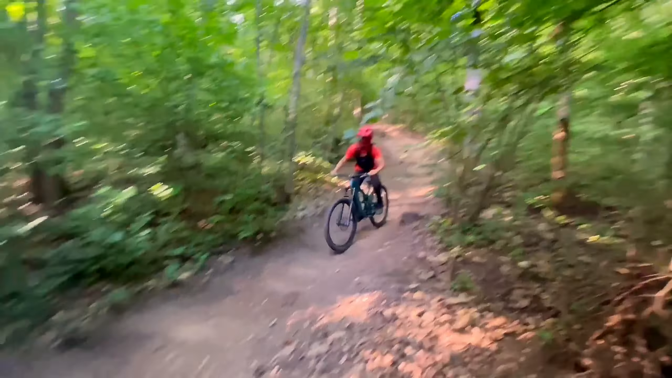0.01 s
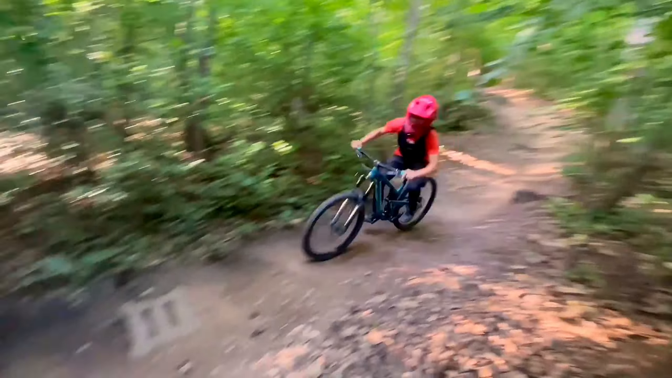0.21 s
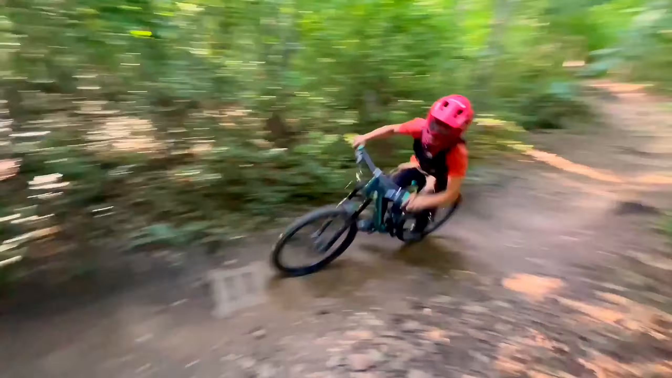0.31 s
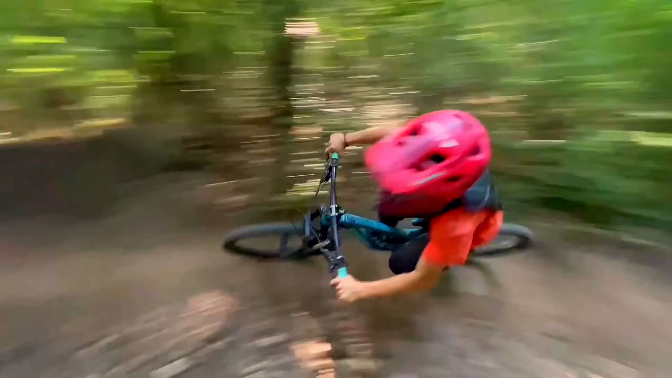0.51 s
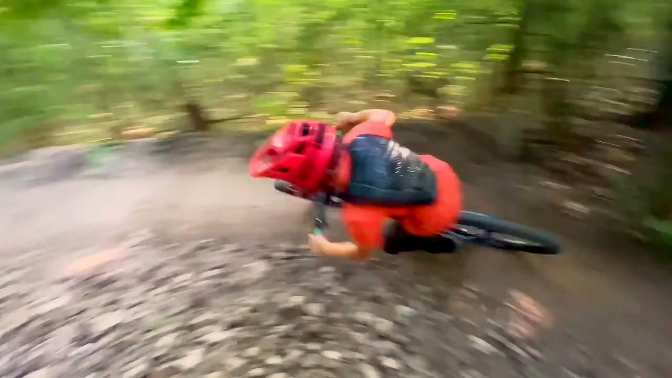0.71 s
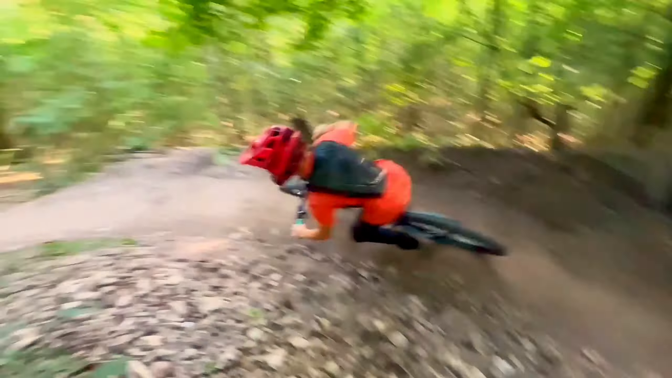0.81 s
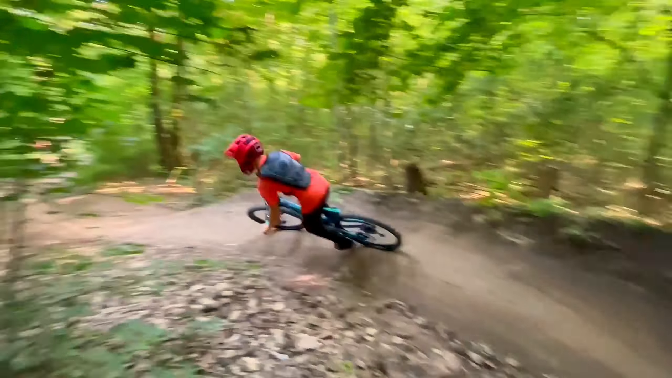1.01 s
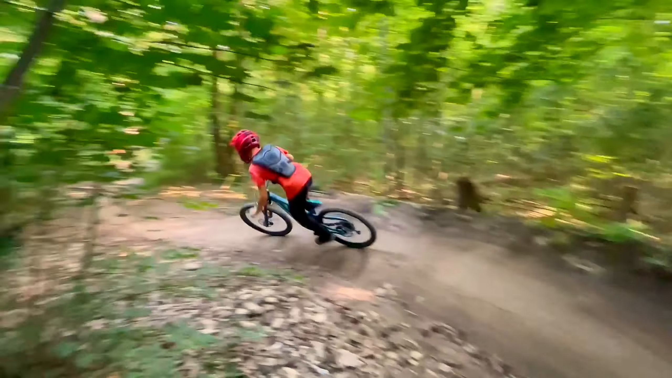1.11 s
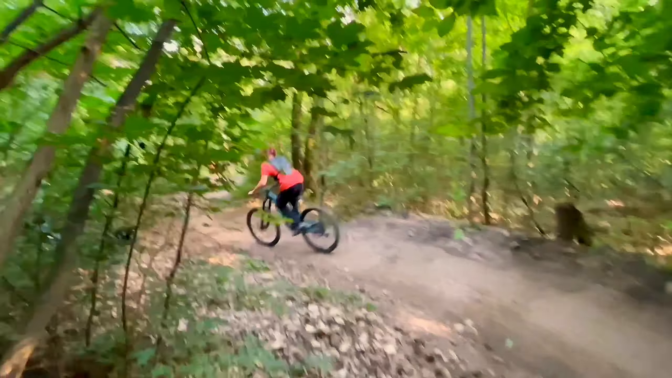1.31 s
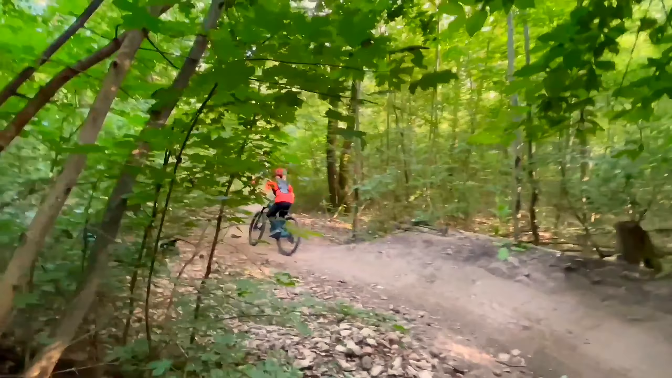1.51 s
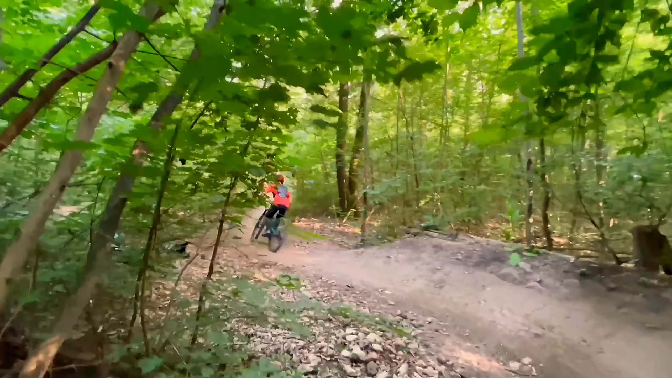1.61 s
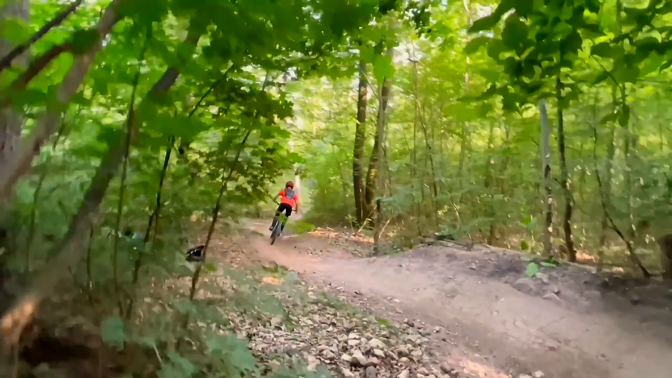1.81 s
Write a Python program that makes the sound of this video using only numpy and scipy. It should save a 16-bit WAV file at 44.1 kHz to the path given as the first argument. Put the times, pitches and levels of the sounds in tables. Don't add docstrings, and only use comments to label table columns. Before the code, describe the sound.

Mountain bike tyres rumble and clatter past close by on a dirt trail, then quickly fade

```python
import sys
import numpy as np
from scipy import signal
from scipy.fft import rfft, irfft
from scipy.io import wavfile
from scipy.ndimage import uniform_filter1d

SR = 44100
rng = np.random.default_rng(int(sys.argv[2]) if len(sys.argv) > 2 else 0)


def field_ratio(decibels):
    return 10 ** (np.asarray(decibels, dtype=float) / 20)


def bounce(signal):
    frames = np.transpose(np.atleast_2d(signal))
    limited = np.clip(frames, -1, 1)
    pcm = np.round(limited * 32767).astype(np.int16)
    wavfile.write(sys.argv[1], SR, pcm)


N = 83790


def evened(x):
    return x / np.sqrt(np.mean(x ** 2) + 1e-20)


def read(points, hz):
    f, value = np.transpose(points)
    return np.interp(np.log(hz + 1), np.log(f + 1), value)


def curve(rows, axis):
    rows = np.array(rows)
    return np.interp(np.arange(N) / SR, rows[:, 0], rows[:, axis])


def add(mix, start_s, sound):
    part = mix[round(start_s * SR):][:len(sound)]
    part += sound[:len(part)]


def resonate(x, hz, width_hz):
    turn = np.exp(2j * np.pi * hz * np.arange(len(x)) / SR)
    r = np.exp(-np.pi * abs(width_hz) / SR)
    return 2 * (turn * signal.lfilter([1 - r], [1, -r], x / turn)).real


def rings(x, modes):
    return sum(field_ratio(db) * evened(resonate(resonate(x, hz, w), hz, w)) for hz, w, db in modes)


def colour(x, points):
    hz = np.fft.rfftfreq(len(x), 1 / SR)
    gain_db = read([(0, -54)] + list(points) + [(SR / 2, -120)], hz)
    return evened(irfft(rfft(x) * field_ratio(gain_db), len(x)))


def wander(size):
    smooth = uniform_filter1d(rng.standard_normal(N), size)
    return evened(uniform_filter1d(smooth, size))


def grains(per_s, spread_db):
    chance, size, sign = rng.random((3, N))
    clicks = (chance < per_s / SR) * np.sign(sign - .5)
    return evened(clicks * field_ratio(spread_db * np.minimum(-np.log(size + 1e-9), 5)))


def drift_field(frames, bins, frame_span, bin_span):
    field = uniform_filter1d(rng.standard_normal((frames, bins)), size=frame_span, axis=0)
    return evened(uniform_filter1d(field, size=bin_span, axis=1)).T


def patchy(x, depth_db):
    hz, t, z = signal.stft(x, SR, nperseg=256, noverlap=192)
    field = drift_field(len(t), len(hz), 40, 5)
    return evened(signal.istft(z * field_ratio(depth_db * field), SR, nperseg=256, noverlap=192)[1][:N])


def tyres():
    # time in seconds, level in dB, cornering load [0-1]
    roll = [(0, -48.5, 0), (.17, -48.5, 0.74), (.24, -43.5, 0.48), (.52, -28, 0.2), (.57, -23.5, 0.5),
            (.66, -28, 0.73), (.74, -31.5, 0.82), (.9, -33, 0.99), (1.0, -31.5, 0.96), (1.088, -27.5, 0.81),
            (1.108, -41, 0.34), (1.2, -46.5, 0.6), (1.225, -37, 0.08), (1.4, -46, 0), (1.48, -41.5, 0),
            (1.7, -41.5, 0.43), (1.8, -45, 0.25), (1.9, -51.5, 0.6)]
    # pitch in Hz, width in Hz, level in dB
    casing_modes = [(249.4, 163, 3), (390, 147, -2.5), (900, 300, -6.5), (153, 69, -7.5)]
    # pitch in Hz, width in Hz, level in dB
    tread_modes = [(1412, 480, 3.5), (1153, 96, -9)]
    # frequency in Hz, level in dB
    scuff_spectrum = [(140, -29), (250, -3), (450, -7.5), (640, -13), (870, -7), (1400, -16), (2000, -14.5),
                      (2700, -19.5)]
    knobs_per_s, knob_jitter = 200, .4
    load_db, slack_db = 41, -14
    scuff_db, scuff_duck_db = -1.5, -6
    rumble_db, rumble_duck_db = -8, -3.5

    turns = np.cumsum(knobs_per_s * (1 + knob_jitter * wander(size=100))) / SR
    knobs = evened(np.diff(np.floor(turns), prepend=0) * field_ratio(2.9 * rng.standard_normal(N)))
    load = np.clip(curve(roll, axis=2), 0, 1)
    slack = 1 - load

    casing = rings(knobs + field_ratio(-2) * grains(2400, 4.5), casing_modes)
    casing = casing * field_ratio(slack_db * slack + 0.58 * wander(size=800))
    tread = rings(knobs + field_ratio(-1.5) * grains(2200, 2.6), tread_modes)
    tread = tread * field_ratio(-load_db * slack + slack_db * slack)
    scuff = patchy(colour(grains(6000, 2.86), scuff_spectrum), depth_db=2.35)
    scuff = scuff * field_ratio(scuff_db + scuff_duck_db * load + 0.3 * wander(size=500))
    rumble = rings(grains(400, 0.98), [(62, 60, 0), (140, 70, -4)])
    rumble = rumble * field_ratio(rumble_db + rumble_duck_db * load)

    rolling = field_ratio(-1.5) * (casing + tread) + scuff + rumble
    dip = 0.6 * load * resonate(rolling, hz=650, width_hz=127)
    return field_ratio(curve(roll, axis=1)) * (rolling - dip)


def knocks():
    # start in seconds, peak in dB, bright snap re knock in dB,
    # knock pitch in Hz, rattle length in seconds
    bumps = [(.004, -34.5, -14, 1400, 0.0042), (.024, -39, -20, 1570, 0.0026),
             (0.04, -48, -19, 1010, 0.004), (0.05, -33, -7, 980, 0.012), (0.09, -35.5, -10, 1180, 0.013),
             (0.099, -37, -11, 860, 0.023), (0.144, -36.5, -7, 1770, 0.0068), (0.172, -36, -21, 695, .008),
             (0.187, -27, -11.5, 1480, 0.0057), (0.206, -36, -5, 1790, 0.0026),
             (0.217, -26, -11, 1390, 0.0089), (0.229, -35, -4, 1510, 0.0094),
             (0.245, -41, -18, 650, 0.0025), (0.271, -31.5, -3, 1170, 0.0059),
             (0.28, -39.5, -1, 1470, 0.011), (.315, -20.5, -12, 1470, 0.016),
             (0.364, -25, -6, 1680, 0.0071), (0.378, -30, -2, 1800, .003), (0.427, -19.5, -5, 1480, 0.0068),
             (0.441, -26, -17, 1800, .003), (0.461, -12.5, -10, 1720, 0.0031),
             (0.468, -19, -16, 1180, 0.0023), (.478, -20, -18, 1390, 0.0035),
             (0.487, -27, -14, 2020, 0.005), (0.494, -30, -3, 1800, 0.0051),
             (0.518, -30, -17, 1320, 0.0037), (0.534, -18.5, -4, 1490, 0.0033),
             (0.547, -22.5, 0.5, 1440, 0.0038), (0.557, -21.5, -7, 1490, 0.0087),
             (0.572, -13.5, -12, 1400, 0.0025), (.582, -23, -27, 1280, 0.018),
             (0.595, -22.5, -7, 1800, 0.0037), (0.606, -26, -2.5, 900, 0.018),
             (0.625, -21.5, -20, 1900, 0.0051), (.654, -19.5, -9, 870, 0.0042),
             (1.131, -37, -22, 1530, .004), (1.15, -34, -16, 1440, 0.025), (1.211, -27, -23, 1010, 0.0075),
             (1.23, -31, -32, 1490, 0.011), (1.465, -36, -8, 1810, 0.005)]
    knock_db, rise_s, t60_s = -7, 0.0024, 0.024
    out, t = np.zeros(N), np.arange(2500) / SR
    dull = signal.butter(3, 5100, fs=SR)
    for start_s, db, snap_db, hz, hold_s in bumps:
        noise = rng.standard_normal(len(t))
        body = rings(noise, [(hz, 790, 0), (660, 300, -5)])
        body = body / np.sqrt(uniform_filter1d(body ** 2, size=200) + 0.18)
        snap = rings(noise, [(2500, 2000, 0), (4300, 1500, -11)])
        rattle = signal.lfilter(*dull, body + field_ratio(snap_db) * snap)
        fade = field_ratio(db + knock_db - 60 * np.maximum(t - hold_s, 0) / t60_s)
        add(out, start_s, rattle * np.minimum(t / rise_s, 1) * fade)
    return out


def clacks():
    # start in seconds, peak in dB, pitch in Hz, width in Hz
    strikes = [(.0075, -30, 1790, 1190), (.058, -36.5, 650, 252), (.0935, -31, 2000, 2200),
               (.175, -40, 700, 150), (.1865, -20.5, 1800, 2200), (.189, -28, 670, 250),
               (.222, -30, 687, 180), (.237, -26.5, 654, 200), (.249, -34, 650, 250),
               (0.2746, -24, 2600, 3000), (0.3642, -24, 2800, 2500), (.4285, -19, 4500, 3500),
               (.4285, -24, 11000, 7000), (.43, -19, 1670, 500), (0.4646, -11.5, 1870, 1290),
               (.4655, -12.5, 940, 593), (.491, -24, 2100, 450), (.519, -17, 1340, 330),
               (.5485, -17, 1500, 1300), (.5745, -7, 1890, 2500), (.5955, -22.5, 1770, 600),
               (1.217, -24, 1110, 1200)]
    out, impulse = np.zeros(N), np.arange(1000) == 0
    for start_s, db, hz, width_hz in strikes:
        ring = rings(impulse, [(hz, width_hz, 0)])
        add(out, start_s, field_ratio(db) * ring / abs(ring).max())
    return out


def thumps():
    # start in seconds, peak in dB, settled pitch in Hz
    hits = [(.042, -47, 61), (0.056, -40.5, 60), (0.096, -36, 60), (.109, -46, 60), (0.15, -39, 59.6),
            (0.191, -27, 58.6), (.222, -33, 60), (0.236, -36, 60), (0.274, -37, 61.7), (0.319, -24, 59.5),
            (.367, -25.5, 60.7), (0.429, -17.5, 56), (0.466, -20.5, 51.7), (.55, -22, 60),
            (0.573, -18, 79.6), (0.649, -37, 55.6), (0.918, -49, 65), (0.974, -36, 122), (1.08, -33, 141),
            (1.15, -37.5, 59), (1.34, -44, 59.7)]
    from_hz, sag_s, rise_s, t60_s = 215, 0.0066, 0.0023, 0.23
    out, t = np.zeros(N), np.arange(6000) / SR
    for start_s, db, hz in hits:
        cycles = hz * t + (from_hz - hz) * sag_s * (1 - np.exp(-t / sag_s))
        envelope = np.minimum(t / rise_s, 1) * field_ratio(db - 60 * t / t60_s)
        add(out, start_s, -envelope * np.sin(2 * np.pi * cycles))
    return out


def spray():
    # time in seconds, level in dB
    level = [(0, -60), (.16, -58), (.195, -49), (.418, -43), (.428, -35), (.44, -39.5), (.568, -35.5),
             (.576, -22), (.6, -30), (.68, -37.5), (.87, -46.5), (1.04, -40), (1.13, -46.5), (1.3, -39),
             (1.36, -47.5), (1.412, -46.5), (1.54, -48), (1.9, -51)]
    # frequency in Hz, level in dB per Hz
    rustle = [(1500, 2.5), (2600, -11.5), (4800, -5), (7500, -8), (8600, -6.5), (10200, -14), (13000, -7.5),
              (15500, -17.5)]
    grain_share = 0.43
    fizz = grain_share * grains(5000, 4.5) + (1 - grain_share) * rng.standard_normal(N)
    uneven = fizz * field_ratio(0.5 * wander(size=300))
    return patchy(colour(uneven, rustle), depth_db=2.0) * field_ratio(curve(level, axis=1))


def booms():
    # start in seconds, peak in dB, pitch in Hz
    hits = [(.325, -32.5, 303), (0.431, -9, 286), (0.539, -8, 253), (0.558, -6.5, 232), (0.576, -10.5, 317),
            (.586, -19.5, 235), (0.603, -11, 480), (0.636, -23, 316), (0.653, -16.5, 363),
            (0.665, -17.5, 390), (1.468, -27, 225), (1.484, -32, 230), (1.645, -31, 215),
            (1.675, -30.5, 204), (1.7, -34, 218)]
    rise_s, t60_s, sag = 0.002, 0.043, 0.13
    out, t = np.zeros(N), np.arange(6000) / SR
    for start_s, db, hz in hits:
        cycles = hz * t * (1 - sag * t / 0.056)
        envelope = np.minimum(t / rise_s, 1) * field_ratio(db - 60 * t / t60_s)
        add(out, start_s, -envelope * np.sin(2 * np.pi * cycles))
    return out


def skid():
    # time in seconds, level in dB
    level = [
        (0, -66),
        (.8, -50.5),
        (.95, -47),
        (1.05, -40.5),
        (1.09, -49),
        (1.11, -77),
        (1.9, -87),
    ]
    return rings(grains(1500, 3.1), [(3800, 1500, 0)]) * field_ratio(curve(level, axis=1))


def hum():
    # time in seconds, level in dB
    level = [
        (0, -78),
        (1.25, -64),
        (1.42, -53.5),
        (1.66, -49.5),
        (1.78, -67),
        (1.9, -72),
    ]
    return rings(grains(1700, 1.7), [(1930, 260, 0)]) * field_ratio(curve(level, axis=1))


def ticks():
    # start in seconds, peak in dB, pitch in Hz
    snaps = [
        (1.356, -36, 1210),
        (1.412, -38.5, 7050),
        (1.419, -36, 1450),
        (1.465, -39.5, 6200),
        (1.595, -37, 851),
        (1.65, -42, 920),
        (1.702, -43, 820),
        (1.784, -41.5, 2170),
        (1.821, -41, 2400),
        (1.827, -43.5, 6260),
    ]
    rise_s, t60_s = 0.0018, 0.056
    out, t = np.zeros(N), np.arange(2500) / SR
    for start_s, db, hz in snaps:
        ring = rings(rng.standard_normal(len(t)), [(hz, 0.4 * hz, db - 2)])
        add(out, start_s, ring * np.minimum(t / rise_s, 1) * field_ratio(-60 * t / t60_s))
    return out


def woods(x):
    t = np.arange(SR // 3) / SR
    t60_s = 0.48
    tail = rng.standard_normal(len(t)) * field_ratio(-60 * t / t60_s) * np.clip(t / 0.0026 - .4, 0, 1)
    return signal.fftconvolve(x, tail / np.linalg.norm(tail))[:N]


def ports(x):
    # frequency in Hz, side re mid in dB
    width = [(60, -28.5), (250, -8.5), (640, -4.5), (1410, 2), (6820, 1.5), (11800, 4.5), (12700, -33),
             (16000, -30)]
    lean, lead_s, drift_rad = 0.25, .00045, 1.65
    hz, t, z = signal.stft(x, SR, nperseg=256, noverlap=192)
    drift = drift_field(len(t), len(hz), 24, 3)
    loose = np.sqrt(np.maximum(field_ratio(2 * read(width, hz)) - lean ** 2, 0))
    loose = loose * np.sign(np.sin(2 * np.pi * hz * lead_s))
    spread = lean + 1j * loose[:, None] * np.exp(1j * drift_rad * drift)
    side = signal.istft(z * spread, SR, nperseg=256, noverlap=192)[1][:N]
    return np.array([x + side, x - side])


def scene():
    bike = tyres() + knocks() + clacks() + thumps() + booms() + skid() + hum() + ticks()
    bike = signal.lfilter(*signal.butter(2, 36, "high", fs=SR), bike)
    return ports(bike + spray() + field_ratio(-15.5) * woods(bike))


def roll_off(x):
    return signal.sosfilt(signal.butter(12, 15730, fs=SR, output="sos"), x)


def record(dry):
    low_pass = signal.firwin(511, 15350, window=("kaiser", 9), fs=SR)
    cut = signal.oaconvolve(dry, low_pass[None], "same")
    return roll_off(cut)


dry = scene()
out = record(dry)
bounce(out)
```